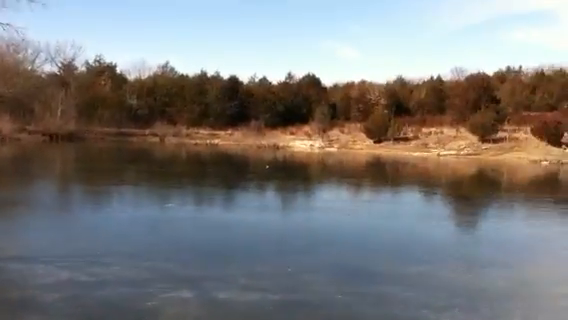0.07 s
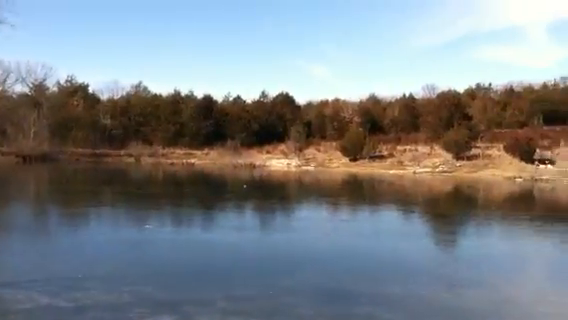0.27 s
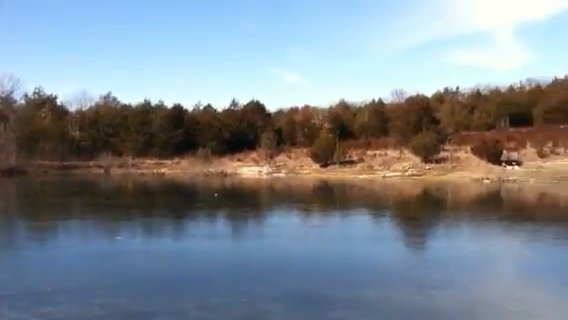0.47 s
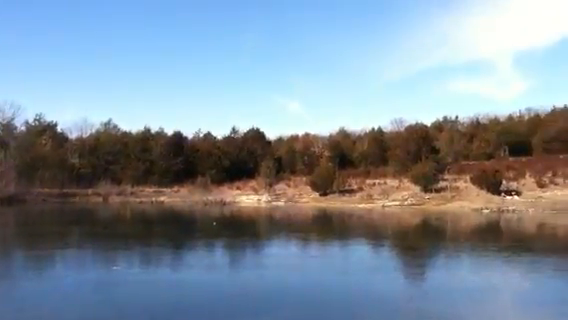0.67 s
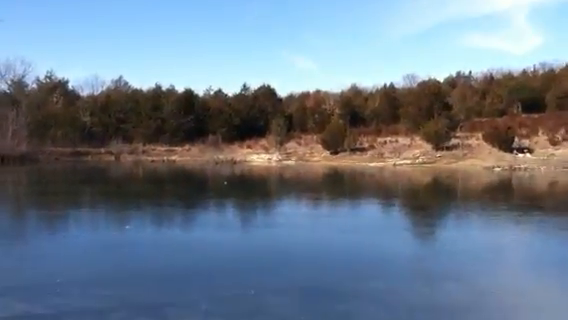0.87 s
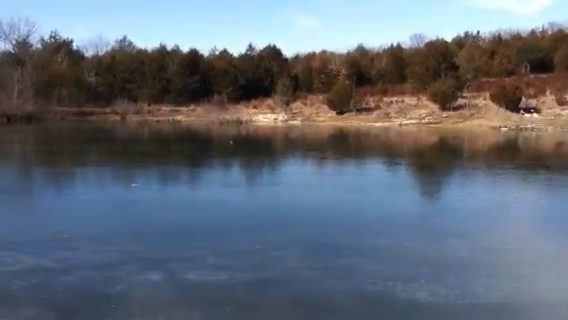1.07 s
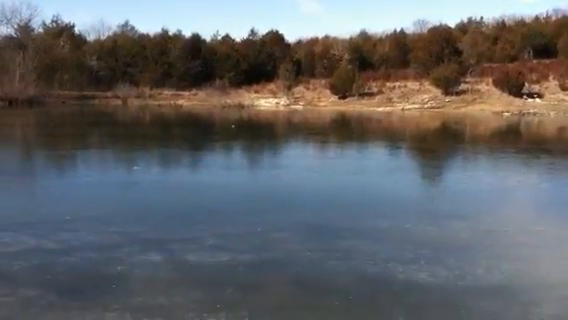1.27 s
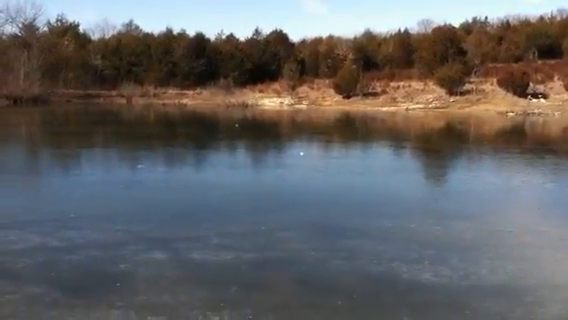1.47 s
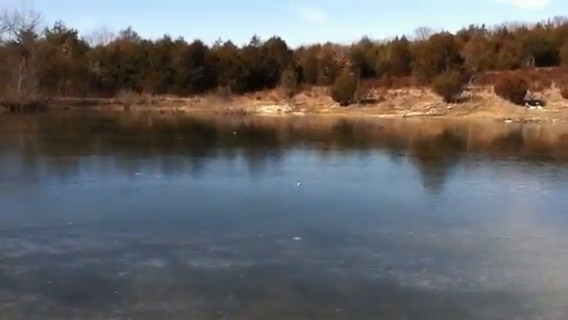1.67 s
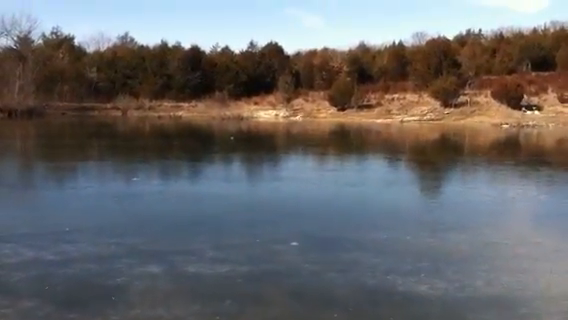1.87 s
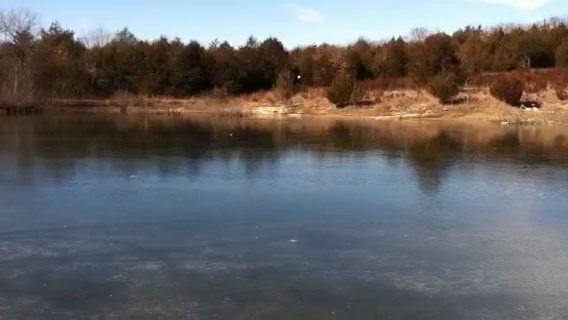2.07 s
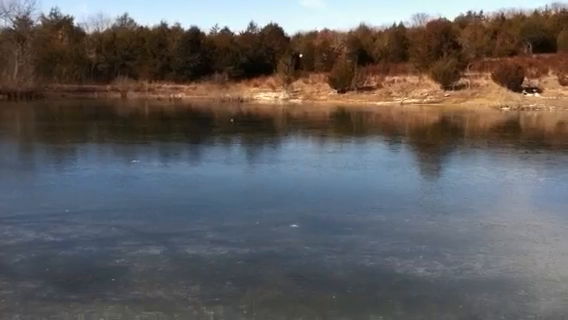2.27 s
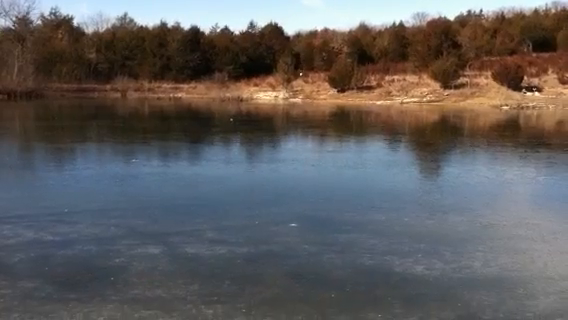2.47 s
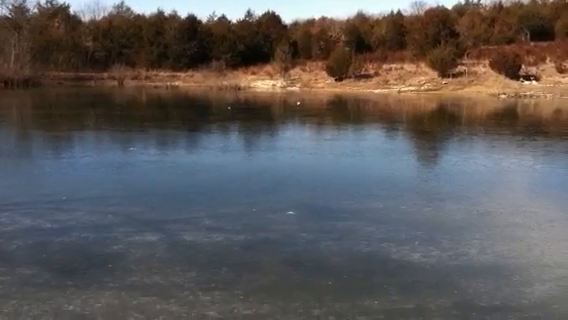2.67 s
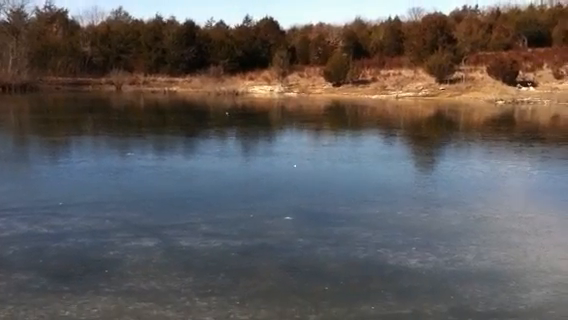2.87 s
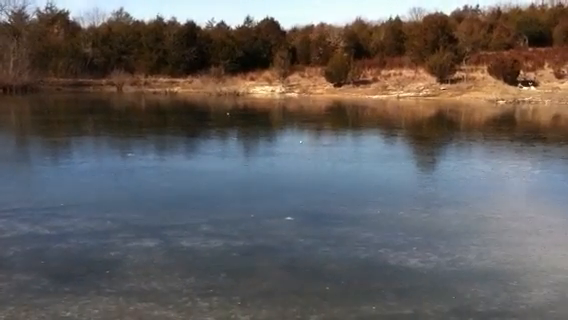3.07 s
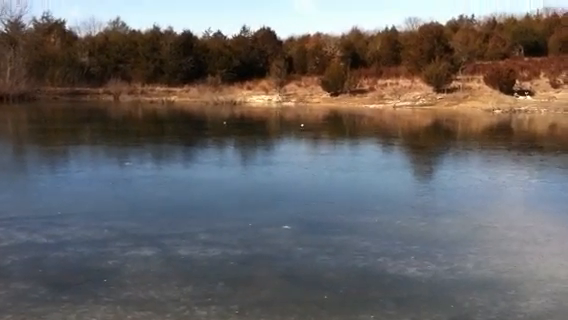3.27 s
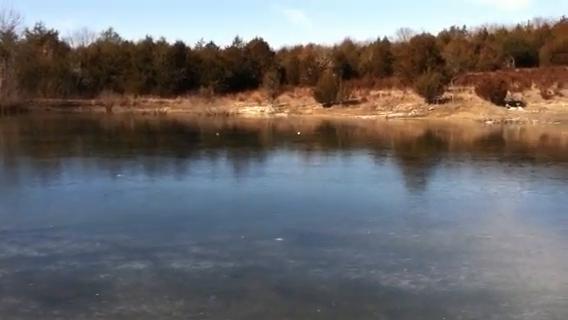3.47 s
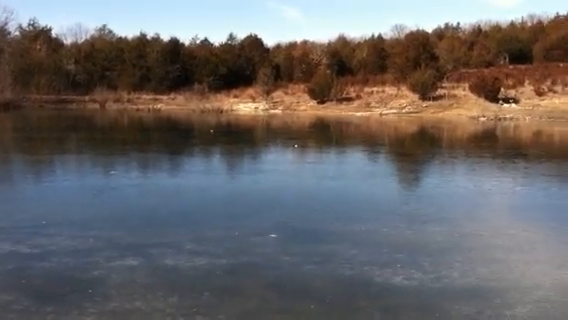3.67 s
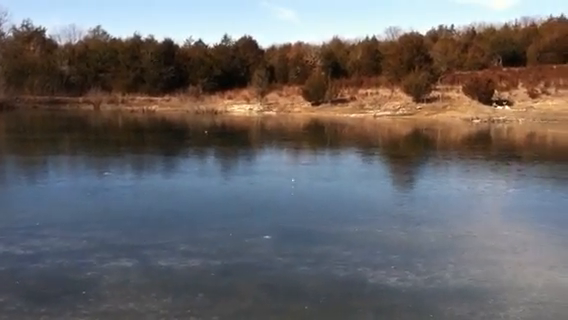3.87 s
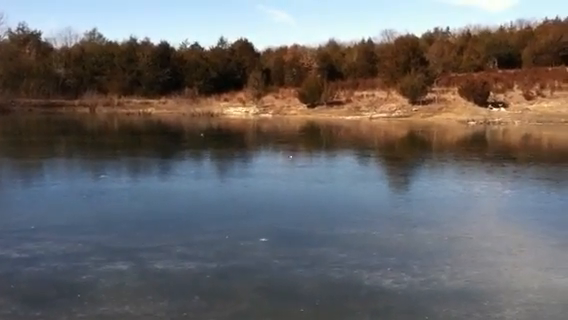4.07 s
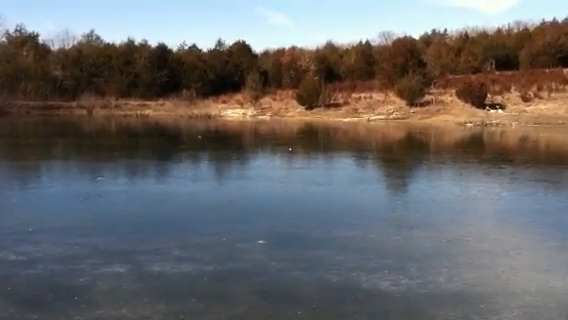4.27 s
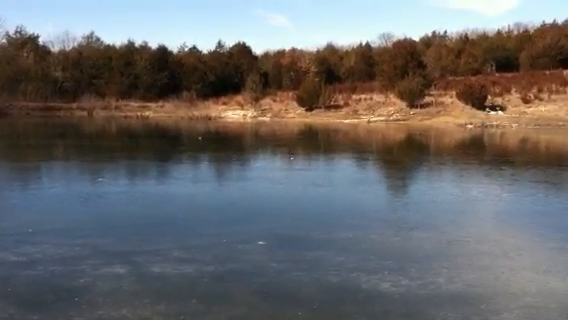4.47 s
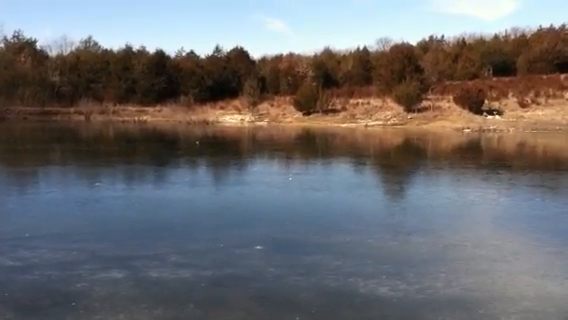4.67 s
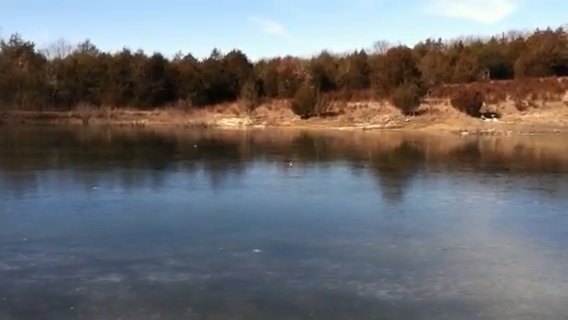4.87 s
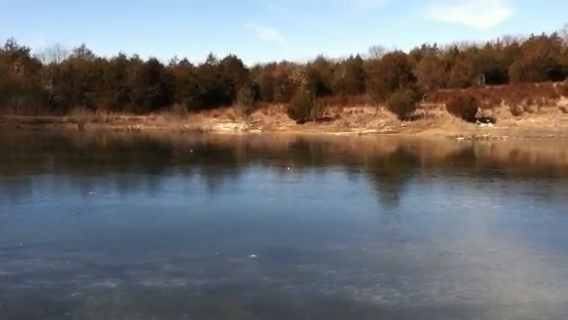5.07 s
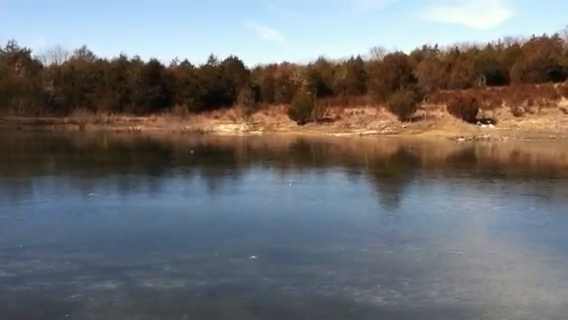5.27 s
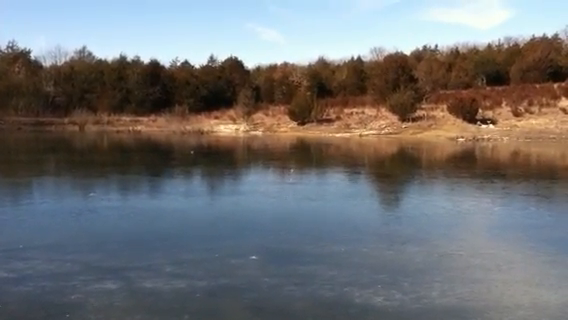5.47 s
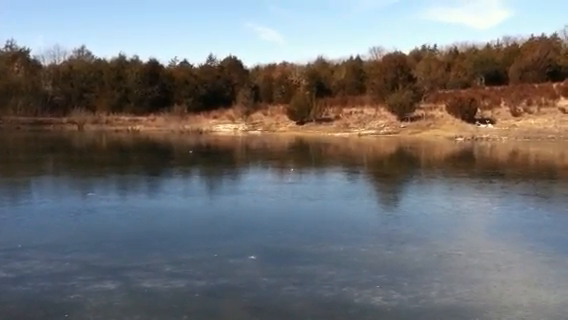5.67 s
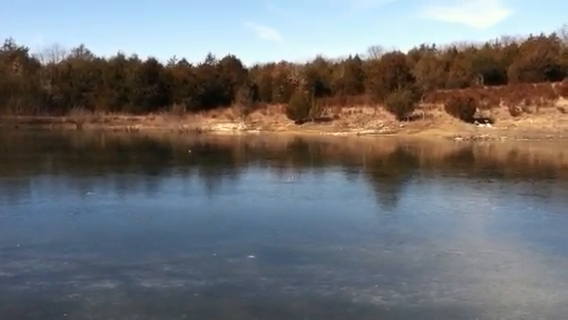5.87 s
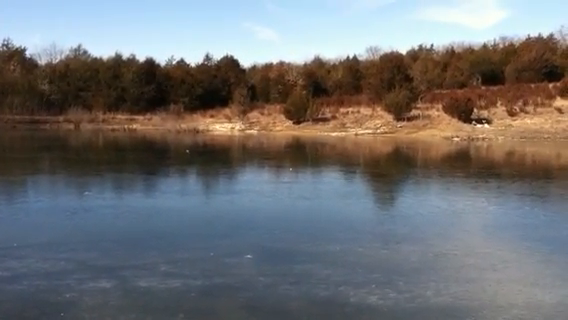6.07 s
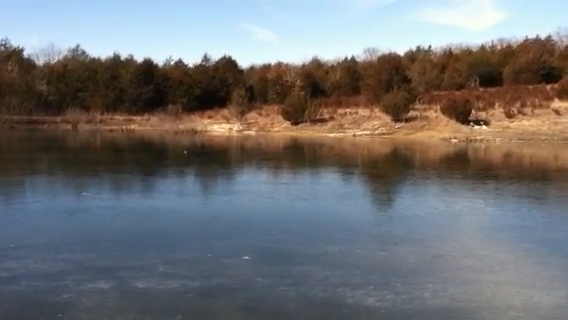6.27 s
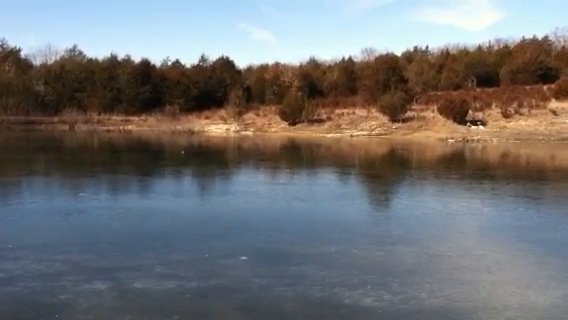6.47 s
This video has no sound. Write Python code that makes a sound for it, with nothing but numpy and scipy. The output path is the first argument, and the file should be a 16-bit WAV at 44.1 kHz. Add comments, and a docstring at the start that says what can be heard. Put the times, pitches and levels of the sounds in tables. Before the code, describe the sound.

Close knocks and a cloth swish, then a ball bounces away over a frozen pond, each hit a falling, ringing chirp with a sharp click.

```python
"""On the bank of a frozen pond a ball is thrown, with knocks and a swish of the sleeve, and bounces away over the ice.
Each bounce sends a dispersive bending wave through the sheet: a falling chirp settles on the note at which
ice and air carry sound equally fast, and ends when the airborne click arrives. Delayed chirps come back from
the shore, filtered noise from the trees. Faint gliding sines whistle far off, over a noise rumble and hush."""
import sys
import numpy as np
from scipy import signal
from scipy.fft import rfft, irfft
from scipy.io import wavfile
from scipy.ndimage import map_coordinates

SR = 44100
rng = np.random.default_rng(int(sys.argv[2]) if len(sys.argv) > 2 else 0)


def waveform_to_disk(signal):
    """Save audio, clipped to [-1, 1], as 16-bit WAV at the path in sys.argv[1]."""
    frames = np.transpose(np.atleast_2d(signal))
    scaled = np.clip(frames, -1, 1) * 32767
    samples = np.round(scaled).astype(np.int16)
    wavfile.write(sys.argv[1], SR, samples)


N = 287532


def from_db(db):
    """Decibels to amplitude ratio: 20 dB is a factor of ten."""
    return 10 ** (np.asarray(db) / 20)


def rms_one(x):
    """Normalise the mean power to one."""
    return x / np.sqrt(np.mean(x ** 2) + 1e-20)


def seconds(length):
    """Sampled time axis of a sound, in seconds."""
    return np.arange(int(length * SR)) / SR


def add(out, s, sound):
    """Superpose a sound on the pressure so far, from time s."""
    at = max(int(s * SR), 0)
    part = sound[:max(N - at, 0)]
    out[at:at + len(part)] += part


def noise(spectrum, size):
    """Coloured noise of unit rms: white noise weighted by a spectral density."""
    hz, level_db = np.transpose(spectrum)
    f = np.maximum(np.fft.rfftfreq(size, 1 / SR), 1)
    # past either end of the curve the level falls by 12 dB per octave
    beyond = np.maximum(1, np.maximum(f / hz[-1], hz[0] / f))
    gain = from_db(np.interp(np.log(f), np.log(hz), level_db)) / beyond ** 2
    white = rng.standard_normal(size)
    return rms_one(irfft(rfft(white) * gain, size))


def drift(t, rate):
    """Slow random modulation: a smooth curve through `rate` random values per second, spread near 1."""
    knots = rng.standard_normal(int(t[-1] * rate) + 2)
    return map_coordinates(knots, [t * rate], order=2, mode="nearest")


def cut(x, hz, kind, order):
    """Low- or high-pass filtering with a maximally flat (Butterworth) passband."""
    sos = signal.butter(order, min(hz, SR / 2 - 1), kind, fs=SR, output="sos")
    return signal.sosfilt(sos, x)


def dying(t, t60):
    """Exponential decay by viscous damping: down 60 dB after t60 seconds."""
    return np.exp(-np.log(1000) * t / t60)


def struck(modes):
    """Modal response to an impulse: damped sines from rows of (frequency_hz, level_db, t60_s)."""
    t = seconds(.06)
    total = np.zeros(len(t))
    for k, (hz, level_db, t60) in enumerate(modes):
        polarity = (-1) ** k
        total += polarity * from_db(level_db) * np.sin(2 * np.pi * hz * t) * dying(t, t60)
    return total


def outdoors():
    """Ambient noise: a distant rumble and the hush of open air, both slowly ebbing."""
    # relative spectral density of the distant rumble: frequency_hz, level_db_per_hz
    rumble_spectrum = [(25, -21), (45, -28.5), (70, -16), (100, -7.5), (150, 1), (200, -3), (280, -18),
                       (400, -24), (800, -46.5)]
    # relative spectral density of the open air: frequency_hz, level_db_per_hz
    air_spectrum = [(150, -10.5), (350, -5), (500, 2), (700, -1.5), (1000, 2.5), (1300, 2), (1800, -2.5),
                    (2500, -12), (4000, -15), (8000, -20.5), (11000, -28), (15500, -33)]
    rumble_start_db, rumble_ebb_db_per_s, rumble_waver_db = -59, 1.0, 0.73
    air_start_db, air_ebb_db_per_s = -60.5, .5
    t = np.arange(N) / SR
    rumble_db = rumble_start_db - rumble_ebb_db_per_s * t + rumble_waver_db * drift(t, 4.3)
    air_db = air_start_db - air_ebb_db_per_s * t
    return from_db(rumble_db) * noise(rumble_spectrum, N) + from_db(air_db) * noise(air_spectrum, N)


def whistles(end_hz=8120, waver_hz=70, flutter_db=2):
    """Frequency-modulated sines: faint high glides onto one note, as of small birds in the trees."""
    # the glides: start_s, length_s, start_pitch_hz, level_db
    glide_rows = [(0.127, 0.19, 8800, -66.5), (0.213, 0.037, 7440, -62), (0.325, 0.038, 9400, -69),
                  (1.538, 0.13, 8850, -77), (2.15, .06, 9150, -73), (3.445, 0.065, 9050, -73),
                  (4.1, 0.11, 9400, -65.5), (5.086, 0.13, 9000, -73), (5.253, 0.15, 9200, -72),
                  (6.068, 0.049, 6550, -67.5)]
    out = np.zeros(N)
    for s, length, start_hz, level_db in glide_rows:
        t = seconds(length)
        glide_hz = start_hz + (end_hz - start_hz) * t / length
        pitch_hz = glide_hz + waver_hz * drift(t, 120)
        tone = np.sin(2 * np.pi * np.cumsum(pitch_hz) / SR)
        swell = np.sin(np.pi * t / length)
        add(out, s, from_db(level_db + flutter_db * drift(t, 90)) * swell * tone)
    return out


def knocks(tick_hz=8000, soft_ratio=2.8, low_hz=140):
    """Contact stiffness sets brightness: dead knocks thud in damped modes; shorter, stronger ones crack more."""
    # thuds close by: start_s, level_db, pitch_hz
    knock_rows = [(0.1544, -29, 565), (0.1592, -32, 490), (0.2379, -21, 426), (0.2446, -30.5, 400),
                  (0.279, -27.5, 660), (0.288, -30, 780), (.4580, -10.5, 466), (0.523, -17.5, 335),
                  (0.5828, -29.5, 266), (.9115, -37, 615), (3.436, -40.5, 375), (3.741, -33.5, 405)]
    # modes of a thud: multiple_of_pitch, level_db (relative to the thud), t60_s
    thud_modes = [(.52, -14, 0.019), (1, 0.5, 0.0068), (1.7, -9.5, 0.0035), (3.1, -18, 0.014)]
    # modes of the hard contact's crack: frequency_hz, level_db (relative to the crack), t60_s
    crack_modes = [(1650, 3, 0.0071), (2230, 9.5, 0.0037), (3410, 5.5, 0.0029), (4330, -2.5, 0.0031)]
    # light ticks without a thud: start_s, level_db
    tick_rows = [(0.3552, -39), (0.7916, -42)]
    # crack under a 0 dB thud at 500 Hz, its growth with pitch and per dB of thud
    crack_base_db, crack_db_per_octave, crack_growth = -3, 23.5, 1.62
    tick_under_crack_db, crack_under_tick_db = -6, -10.5
    crack = struck(crack_modes)
    out = np.zeros(N)
    for s, thud_db, thud_hz in knock_rows:
        octaves = np.log2(thud_hz / 500)
        crack_db = crack_base_db + crack_growth * thud_db + crack_db_per_octave * octaves
        thud = sum(struck([(thud_hz * multiple, thud_db + db, t60)]) for multiple, db, t60 in thud_modes)
        thud = cut(thud, soft_ratio * thud_hz, "low", order=2)
        tick = struck([(tick_hz, crack_db + tick_under_crack_db, .001)])
        add(out, s, from_db(crack_db) * crack + tick - thud)
    for s, tick_db in tick_rows:
        tick = struck([(tick_hz, tick_db, .001)])
        add(out, s, from_db(tick_db + crack_under_tick_db) * crack + tick)
    return cut(out, low_hz, "high", order=2)


def swish(peak_s=.3, level_db=-54, attack_s=0.045, t60_s=0.27, scuff_db=3):
    """Friction noise: the sleeve brushes through the throw, swelling to a peak and dying away unevenly."""
    # relative spectral density of the cloth: frequency_hz, level_db_per_hz
    sleeve_spectrum = [(100, -13), (400, 12), (900, 3), (2500, 4.5), (4500, -10), (9000, -17), (15000, -40)]
    t = np.arange(N) / SR - peak_s
    swell = np.exp(-.5 * (np.minimum(t, 0) / attack_s) ** 2)
    fade = dying(np.maximum(t, 0), t60_s)
    scuffing = from_db(scuff_db * drift(t - t[0], 179.5))
    return from_db(level_db) * swell * scuffing * fade * noise(sleeve_spectrum, N)


def chirp(flight, note_hz, share=.64, sweep_hz=1750, settle=0.01479, width_hz=380, steep=1.83,
          sag_hz=145, waver_hz=32, stop_t60=0.00087, swell_db_per_s=70, uneven_db_per_s=35):
    """Dispersion: high bending waves outrun low ones; ice radiates best where they match the speed of sound.
    The note fills the last share of the flight, until the direct sound through the air catches up."""
    t = seconds(flight + .02) - (1 - share) * flight   # zero where the chirp begins
    lasts = share * flight
    above_hz = sweep_hz * np.exp(-np.maximum(t, 0) / (settle * np.sqrt(lasts)))
    # the early part is radiated close by, where thicker ice sounds a little lower
    below_hz = sag_hz * np.clip(1 - t / lasts, 0, 1)
    pitch_hz = note_hz + above_hz - below_hz + waver_hz * drift(t - t[0], 306)
    wave = np.sin(2 * np.pi * np.cumsum(pitch_hz) / SR)
    radiated = np.clip(t / .001, 0, 1) / (1 + (above_hz / width_hz) ** steep)
    # a longer path crosses more flaws
    uneven_ice = from_db(uneven_db_per_s * flight * drift(t - t[0], 400))
    # the note swells towards its end
    nearing = from_db(swell_db_per_s * (np.minimum(t, lasts) - lasts / 2))
    stop = dying(np.maximum(t - lasts, 0), stop_t60)
    return wave * radiated * uneven_ice * nearing * stop


def scattered(spectrum, note_hz, delays, gains, size=65536):
    """Dispersive scattering: cracks and banks return falling chirps, each with its note at its own delay."""
    hz = np.arange(1, size // 9) * SR / size
    points_hz, level_db = np.transpose(spectrum)
    colour = from_db(np.interp(np.log(hz), np.log(points_hz), level_db))
    colour = colour * np.minimum(hz / points_hz[0], 1) ** 2
    # phase growing as the root of frequency makes the delay shrink as its inverse root
    cycles = 2 * np.outer(delays, np.sqrt(hz * note_hz)) + rng.random((len(delays), 1))
    arrivals = gains @ np.exp(-2j * np.pi * cycles)
    wave = irfft(np.r_[0, colour * arrivals], size)
    return wave * np.sqrt(.05 * SR / np.sum(wave ** 2))   # the energy of 50 ms at unit rms


def spread(start, length, count):
    """Irregular scatterers: one random arrival time in each equal slice of a stretch."""
    return start + length * (np.arange(count) + rng.random(count)) / count


def patchy(count, poorest_db=-13, best_db=8):
    """Uneven reflectivity: some reflectors are much better than others."""
    return from_db(rng.uniform(poorest_db, best_db, count))


def shore(flight, note_hz, near_db, far_db, flaws_db=-13, near_t60=0.31,
          far_peak=0.13, far_spread=0.08, ring_db=-7, ring_t60=1.24):
    """Reverberation in the sheet: near bank at once, far edges later, and the pond rings on faintly."""
    # relative spectral densities, each with columns frequency_hz, level_db_per_hz:
    # flaws on the way
    flaw_spectrum = [(350, -11.5), (750, -0.5), (1150, -8), (1500, 1.5), (2100, -1), (3000, -19.5)]
    # the near bank
    near_spectrum = [(150, -40), (500, -20.5), (750, -23), (950, -7), (1130, 3.5), (1300, -0.5),
                     (1520, -21), (1760, -15.5), (3000, -34.5), (4500, -46)]
    # the far edges
    far_spectrum = [(500, -26), (900, -23.5), (1100, -3.5), (1280, 9), (1550, 8.5), (1900, 1.5),
                    (2500, -7.5), (4000, -21.5)]
    # the whole pond
    pond_spectrum = [(500, -28), (1020, -20.5), (1200, 5.5), (1380, -7.5), (2000, -14), (3500, -22)]
    # arrival times in seconds after the impact; the flaws roughen the chirp itself
    flaws = spread(.45 * flight, .55 * flight, count=14)
    near = spread(flight + .004, .25, count=56)
    far = spread(flight + .02, .3, count=80)
    late = spread(.14, .66, count=36)
    near_gains = dying(near, near_t60) * patchy(len(near))
    far_gains = np.exp(-.5 * ((far - far_peak) / far_spread) ** 2) * patchy(len(far))
    return (from_db(near_db + flaws_db) * scattered(flaw_spectrum, note_hz, flaws, patchy(len(flaws)))
            + from_db(near_db) * scattered(near_spectrum, note_hz, near, near_gains)
            + from_db(far_db) * scattered(far_spectrum, note_hz, far, far_gains)
            + from_db(far_db + ring_db) * scattered(pond_spectrum, note_hz, late, dying(late, ring_t60)))


def bounce_through_ice(out, s, distance_m, note_db, click_db,
                       forerunner_db=-7, forerunner_hz=2700, forerunner_lead=0.91):
    """Wave-type speeds: a tick rides the fast compression wave, then come bending chirp, dent and echoes."""
    # modes of the ice under the ball: frequency_hz, level_db (relative to the dent), t60_s
    dent_modes = [(506, -2.5, 0.013), (1757, -2.5, .018), (2330, -4.5, .009)]
    flight = distance_m / 343   # speed of sound in m/s
    # the ice thins away from the bank, so its note rises
    note_hz = 1108.6 + 6.3 * distance_m
    # treble limit: 2850 Hz at 10 m, lower farther out
    top_hz = 2850 * (10 / distance_m) ** .72
    # dent against click: 4.5 dB at 10 m, losing 6.5 dB per doubling of distance
    dent_db = click_db + 4.5 - 6.5 * np.log2(distance_m / 10)
    # echoes follow only a share of the note's level
    near_db = -22.5 + 0.72 * note_db
    far_db = -38 + 0.35 * note_db
    forerunner = struck([(forerunner_hz, dent_db + forerunner_db, .007)])
    waves = [(s - flight, from_db(note_db) * chirp(flight, note_hz)),
             (s - flight, shore(flight, note_hz, near_db, far_db)),
             (s - forerunner_lead * flight, forerunner),
             (s, from_db(dent_db) * struck(dent_modes))]
    for start, wave in waves:
        # farther, slower bounces bring less treble through the ice
        add(out, start, cut(wave, top_hz, "low", order=6))


def bounce_through_air(out, s, click_db, ring_db, ring_hz=4480, click_echo_db=-31, click_t60=0.33,
                       ring_echo_db=-31, ring_t60=0.42, splash_db=-10, splash_t60=0.012,
                       trees_uneven_db=4, treeline_db=-43, treeline_s=.1, treeline_spread_s=.035):
    """Direct and reflected sound: click and ball ring, a glance off the bank, an uneven return from the trees."""
    # modes of the ball's click: frequency_hz, level_db (relative to the click), t60_s
    click_modes = [(3820, -10.5, 0.0059), (5050, 0, 0.0025), (8230, -7, 0.0053), (9290, -3, 0.0048),
                   (12000, -11.5, .002)]
    # relative spectral density of the click's echo: frequency_hz, level_db_per_hz
    click_echo_spectrum = [(1500, -7), (3000, -9), (4000, -2.5), (5300, -9.5), (7000, -11.5), (9500, -11.5),
                           (12000, -20.5), (16000, -34.5)]
    # relative spectral density of the ball's ring back from the trees: frequency_hz, level_db_per_hz
    ring_echo_spectrum = [(3900, -25), (4350, -1), (4550, -4.5), (4750, -11), (5200, -26)]
    t = seconds(.6)
    add(out, s, from_db(click_db) * struck(click_modes) + struck([(ring_hz, ring_db, .008)]))
    trees = from_db(trees_uneven_db * drift(t, 78))
    treeline = from_db(treeline_db) * np.exp(-.5 * ((t - treeline_s) / treeline_spread_s) ** 2)
    off_bank = from_db(splash_db) * dying(t, splash_t60)
    off_trees = trees * (from_db(click_echo_db) * dying(t, click_t60) + treeline)
    add(out, s, from_db(click_db) * noise(click_echo_spectrum, len(t)) * (off_bank + off_trees))
    ring_echo = noise(ring_echo_spectrum, len(t)) * trees * dying(t, ring_t60)
    add(out, s, from_db(ring_db + ring_echo_db) * ring_echo)


def ball():
    """Two-path propagation: every bounce is heard through the ice and through the air."""
    # bounces: click_arrives_s, distance_m, note_db, click_db, ball_ring_db
    bounce_rows = [(1.645, 6.27, -9, -24, -18), (3.0044, 9.86, -11, -31, -50),
                   (3.9801, 13.15, -17, -34.5, -37), (4.7510, 14.7, -21, -42, -42),
                   (5.3930, 15.8, -24, -40.5, -37.5), (5.9564, 17.4, -26.5, -43.5, -41),
                   (6.4190, 18.7, -28, -44.5, -43)]
    out = np.zeros(N)
    for s, distance_m, note_db, click_db, ring_db in bounce_rows:
        bounce_through_ice(out, s, distance_m, note_db, click_db)
        bounce_through_air(out, s, click_db, ring_db)
    return out


def scene():
    """Superposition: the throw and the bounces, with far whistles, in the open air."""
    throw_and_bounces = cut(ball() + knocks() + swish(), 160, "high", order=2)
    return (throw_and_bounces + whistles() + outdoors())[None]


def record(dry):
    """Band limitation: a steep elliptic low-pass cuts the top at 15.9 kHz."""
    sos = signal.ellip(10, .1, 80, 15900, fs=SR, output="sos")   # 0.1 dB ripple, 80 dB rejection
    return signal.sosfilt(sos, dry)


dry = scene()
out = record(dry)
waveform_to_disk(out)
```